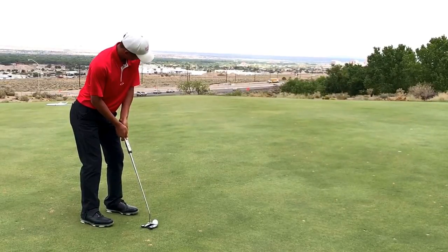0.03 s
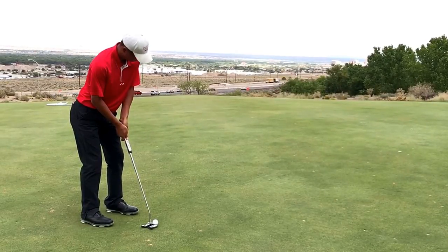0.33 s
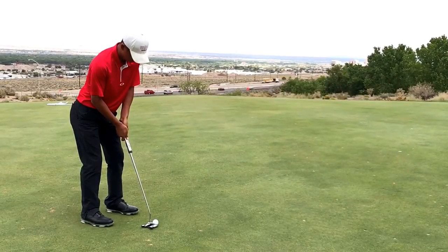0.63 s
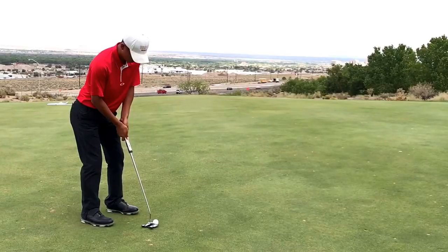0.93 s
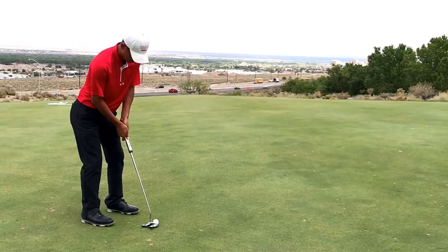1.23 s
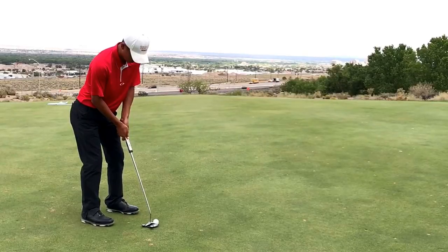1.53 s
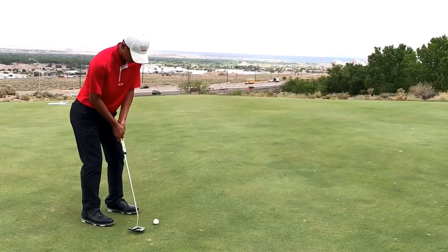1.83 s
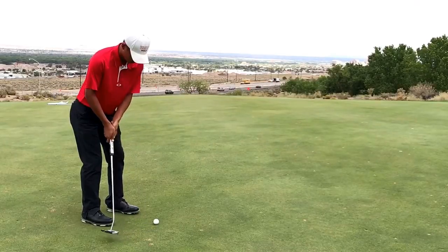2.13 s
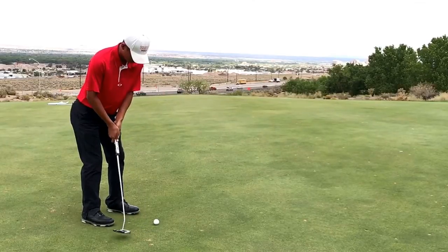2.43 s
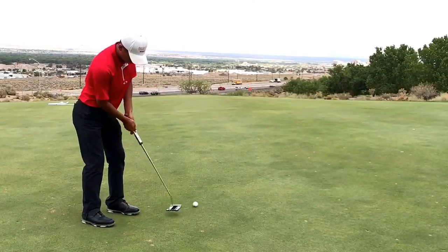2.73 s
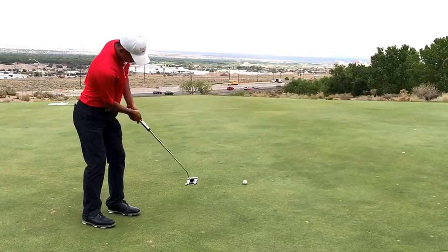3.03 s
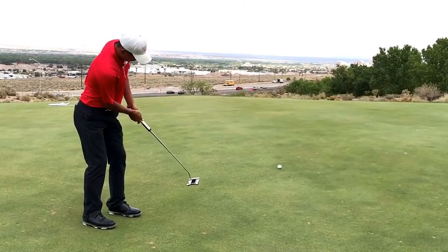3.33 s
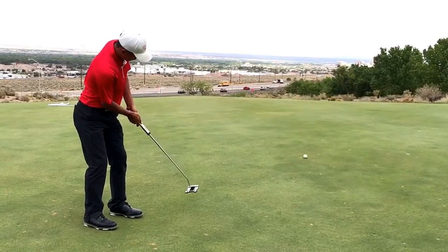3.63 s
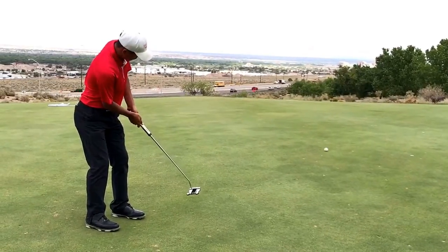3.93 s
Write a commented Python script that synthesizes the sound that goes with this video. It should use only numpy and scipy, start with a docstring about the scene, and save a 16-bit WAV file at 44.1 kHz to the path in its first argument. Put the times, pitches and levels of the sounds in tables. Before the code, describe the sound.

One crisp golf putt clicks on an open green, picked up by a nearby microphone. Before and after it, far tyres rush and engines drone over a low outdoor rumble, with light leaf rustle and a few faint chirps.

```python
"""An open green above a busy road, one microphone beside the putting surface.
Far tyres rush and engines drone over a low outdoor rumble, stirring leaves and airy hiss,
with faint insect-like ticks and a few far chirps. The putter meets the ball with one short, dry
click as head and ball ring. A faint high hiss swells and fades while the ball rolls away."""
import sys
import numpy as np
from scipy import signal
from scipy.fft import rfft, irfft
from scipy.io import wavfile

SR = 44100
rng = np.random.default_rng(int(sys.argv[2]) if len(sys.argv) > 2 else 0)


def output_pcm(signal):
    """Save a mono or channel-first signal as 16-bit PCM at the path in sys.argv[1].

    Samples are clipped to [-1, 1] before scaling.
    """
    pcm = np.clip(np.atleast_2d(signal).T, -1, 1) * 32767
    wavfile.write(sys.argv[1], SR, np.round(pcm).astype(np.int16))


N = 176400
TIME = np.arange(N) / SR


def from_db(db):
    """Decibels to gain."""
    return 10 ** (np.asarray(db) / 20)


def rms_one(x):
    """Scale to an rms of 1."""
    return x / np.sqrt(np.mean(x ** 2) + 1e-20)


def level(rows):
    """Gain over time from rows of time_s, level_db."""
    return from_db(np.interp(TIME, *np.transpose(rows)))


def drift(rate_hz):
    """Smooth random wander with an rms of 1, mostly slower than rate_hz."""
    step, settle = 40, 2000
    pole = np.exp(-2 * np.pi * rate_hz * step / SR)
    white = rng.standard_normal(N // step + settle + 2)
    slow = signal.lfilter([1], [1, -2 * pole, pole * pole], white)[settle:]
    return np.interp(np.arange(N) / step, np.arange(len(slow)), rms_one(slow))


def noise(spectrum, waver_db=0):
    """Noise of the given colour whose octaves each waver on their own; rms 1."""
    hz = np.maximum(np.fft.rfftfreq(N, 1 / SR), 1)
    points_hz, points_db = np.transpose(spectrum)
    colour = from_db(np.interp(np.log(hz), np.log(points_hz), points_db))
    bins = rfft(rng.standard_normal(N)) * colour
    octave = np.maximum(np.log2(hz).astype(int), 5)
    bands = (irfft(bins * (octave == k), N) for k in np.unique(octave))
    return rms_one(sum(band * from_db(waver_db * drift(6.7)) for band in bands))


def bump(centre_s, sigma_s):
    """A bell-shaped rise and fall around one moment."""
    return np.exp(-.5 * ((TIME - centre_s) / sigma_s) ** 2)


def ring(force, hz, t60_s):
    """One damped mode: a unit impulse sets a sine of height 1 ringing."""
    pole = from_db(-60 / (t60_s * SR))
    angle = 2 * np.pi * hz / SR
    return signal.lfilter([0, np.sin(angle)], [1, -2 * pole * np.cos(angle), pole * pole], force + 1e-18)


def delayed(x, seconds):
    """The same sound a little later."""
    return np.interp(TIME - seconds, TIME, x, left=0)


def tyres():
    """Tyres on the far road rush around 1 kHz; the brighter tread noise fades as the cars move on."""
    # rise and fall of the rush: time_s, relative_db
    rush_level = [(0.0, -45.5), (0.11, -48), (1.31, -49), (1.58, -46.5), (1.79, -50), (2.23, -46.5),
                  (2.41, -49), (2.61, -48.5), (2.8, -50.5), (3.49, -48.5), (3.62, -51.5), (4.0, -51.5)]
    # colour of the rush: freq_hz, relative_db
    rush_spectrum = [(60, -42), (200, -10.5), (480, -8.5), (620, -2.5), (800, 0), (1100, -0.5),
                     (1600, -14.5), (2000, -21.5), (3500, -40), (5000, -54.5), (16000, -95)]
    # tread noise at the microphone: time_s, level_db
    tread_level = [(0, -49), (.25, -52), (.9, -52.5), (1.15, -50), (1.55, -53), (1.75, -53), (1.97, -51.5),
                   (2.5, -55), (3.1, -53.5), (4, -53)]
    # colour of the tread noise: freq_hz, relative_db
    tread_spectrum = [(300, -44), (900, -7.5), (1250, -0.5), (1600, -3.5), (2000, -10), (2600, -16),
                      (3500, -29.5), (5000, -45), (16000, -88)]
    rush = from_db(0.5) * level(rush_level) * noise(rush_spectrum, waver_db=0.66)
    tread = level(tread_level) * noise(tread_spectrum, waver_db=0.1)
    return rush + tread


def engines():
    """Far engines drone in a narrow band, wandering in pitch and fluttering in level."""
    # the drone swells and sinks: time_s, relative_db
    drone_level = [(0, -50.5), (.5, -44), (.7, -41.5), (1.0, -43.5), (1.15, -44.5), (1.35, -42), (1.6, -54),
                   (1.72, -34.5), (1.8, -62), (2.33, -58), (2.49, -36), (2.6, -53.5), (2.95, -44),
                   (3.1, -38.5), (3.25, -57), (3.38, -40), (3.5, -51), (3.9, -40)]
    pitch_hz, wander_hz, flutter_db = 75.3, 3.53, 4
    phase = 2 * np.pi * np.cumsum(pitch_hz + wander_hz * drift(8.1)) / SR
    flutter = from_db(flutter_db * np.minimum(drift(20.3), 1))
    return from_db(-2) * level(drone_level) * rms_one(np.sin(phase) * flutter)


def rumble():
    """Uneven low outdoor rumble, its deepest part coming in lumps."""
    # rise and fall of the low rumble: time_s, relative_db
    low_level = [(0, -52), (.3, -48), (.5, -54), (.8, -51.5), (.93, -53), (1.25, -50), (1.48, -45.5),
                 (1.58, -49), (1.8, -45), (2.0, -49.5), (2.55, -50.5), (2.9, -46), (3.15, -46), (3.55, -48),
                 (3.75, -45.5), (4, -49)]
    # colour of the low rumble: freq_hz, relative_db
    low_spectrum = [(15, -54), (40, -21), (70, -5), (100, 1.5), (160, -1), (200, -7), (250, -7), (330, -15),
                    (480, -23.5), (1000, -55), (4000, -100)]
    # the deep lumps: time_s, relative_db
    deep_level = [(0, -49.5), (.7, -55), (.82, -42.5), (1.1, -50), (1.34, -43), (1.47, -46), (1.6, -53),
                  (1.92, -46), (2.1, -52), (2.24, -47), (2.35, -52), (3.0, -56), (3.3, -47.5), (4, -48.5)]
    # colour of the lumps: freq_hz, relative_db
    deep_spectrum = [(10, -50), (27, -26), (38, -9), (48, -4.5), (62, -1.5), (90, -14.5), (200, -36),
                     (1000, -110)]
    low = from_db(1.5) * level(low_level) * noise(low_spectrum, waver_db=1.5)
    deep = from_db(1) * level(deep_level) * noise(deep_spectrum, waver_db=2.2)
    return low + deep


def leaves():
    """Leaves stir in the trees, a soft rustle that slowly grows."""
    # rustle at the microphone: time_s, level_db
    rustle_level = [(0, -77), (.6, -70.5), (1.5, -67.5), (1.87, -65.5), (2.2, -68.5), (2.55, -68.5),
                    (3.0, -65.5), (4, -66)]
    # colour of the rustle: freq_hz, relative_db
    rustle_spectrum = [(800, -21), (2200, 3), (3200, 2.5), (4200, -4.5), (5000, -11), (6200, -14.5),
                       (8000, -25), (16000, -34)]
    return level(rustle_level) * noise(rustle_spectrum, waver_db=.5)


def air():
    """A faint, steady airy hiss lies over the green."""
    # colour of the hiss: freq_hz, relative_db
    air_spectrum = [(1500, 5.5), (2800, 0.5), (3700, -3.5), (4500, -8), (5000, -12), (6200, -13.5),
                    (7700, -20), (9300, -18), (10400, -23), (11300, -18), (13500, -19), (16000, -21)]
    return from_db(-64) * noise(air_spectrum, waver_db=-0.06)


def ticks():
    """Soft, narrow bursts of very high hiss, as of an insect in the grass."""
    # the ticks: centre_s, level_db
    bursts = [(.08, -85), (.15, -83), (1.245, -84), (1.45, -85), (1.55, -86), (2.28, -82.5), (2.445, -84),
              (2.545, -83), (2.845, -84)]
    # their colour: freq_hz, relative_db
    tick_spectrum = [(10000, -30), (12600, -5), (13500, 2), (14400, -7), (16000, -24)]
    envelope = sum(from_db(db) * bump(centre_s, sigma_s=0.0058) for centre_s, db in bursts)
    return envelope * noise(tick_spectrum)


def chirps():
    """Short wavering notes, perhaps a distant bird."""
    # the far notes: centre_s, pitch_hz, level_db
    notes = [(.755, 3070, -65), (1.85, 2000, -55.5), (1.86, 2480, -56)]
    waver_hz = 45 * drift(64.5)
    song = np.zeros(N)
    for centre_s, pitch_hz, db in notes:
        phase = 2 * np.pi * np.cumsum(pitch_hz + waver_hz) / SR
        song += from_db(db) * bump(centre_s, sigma_s=0.013) * np.sin(phase)
    return song


def putt():
    """A brief hard contact rings head and ball; a close reflection and a short ground scatter follow."""
    # the putter meets the ball: start_s, force_db
    strikes = [(2.6645, -26)]
    # modes of putter head and ball: pitch_hz, relative_db, t60_s
    modes = [(380, -19, .01), (680, -11, .007), (1080, -2, .012), (1600, -4, .009), (3120, -21, 0.012),
             (3820, -15, 0.0155), (4180, -16.5, 0.015), (5370, -17, 0.011), (6800, -26, .01),
             (9230, -21.5, 0.0069), (11050, -25, 0.0099), (12400, -20, .005), (13200, -23, .005),
             (15000, -35, .006)]
    # dull scatter from the ground around: freq_hz, relative_db
    scatter_spectrum = [(200, -20), (700, 7), (1200, 0), (2300, -20), (3900, -8), (5400, -27), (8000, -37),
                        (15000, -32)]
    contact_s, release_db = 0.00071, -19
    echo_s, echo_db = 0.0018, -13
    scatter_t60_s, scatter_db = 0.029, -16
    impact = np.zeros(N)
    for start_s, force_db in strikes:
        impact[int(start_s * SR)] = from_db(force_db)
    tail = signal.lfilter([1], [1, -from_db(-60 / (scatter_t60_s * SR))], impact + 1e-18)
    scatter = from_db(scatter_db) * tail * noise(scatter_spectrum)
    # the ball leaves the face with a second, opposite impulse
    force = impact - from_db(release_db) * delayed(impact, contact_s)
    click = np.zeros(N)
    for k, (hz, db, t60_s) in enumerate(modes, 1):
        click += (-1) ** k * from_db(db) * ring(force, hz, t60_s)  # neighbours alternate in polarity
    return click + delayed(from_db(echo_db) * click + scatter, echo_s)


def high_hiss():
    """After the putt a thin hiss grows slowly and dies more quickly."""
    # colour of the hiss: freq_hz, relative_db
    hiss_spectrum = [(3000, -15), (5000, -4), (6400, 1), (8000, -3), (9300, -4), (10300, -7), (11200, -2),
                     (13300, -1), (15800, -7)]
    start_s, peak_s, end_s, peak_db = 3.15, 3.39, 3.54, -71
    swell = np.interp(TIME, [start_s, peak_s, end_s], [0, 1, 0])
    return from_db(peak_db) * swell * noise(hiss_spectrum, waver_db=.6)


def scene():
    """Everything at one microphone beside the green."""
    background = tyres() + engines() + rumble() + leaves() + air()
    return (background + ticks() + chirps() + putt() + high_hiss())[None]


def record(dry):
    """A steep low-pass cuts the very top of the treble."""
    cutoff_hz = 15900
    return signal.sosfilt(signal.ellip(10, .1, 70, cutoff_hz, fs=SR, output="sos"), dry)


dry = scene()
out = record(dry)
output_pcm(out)
```